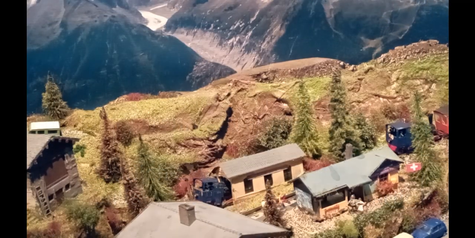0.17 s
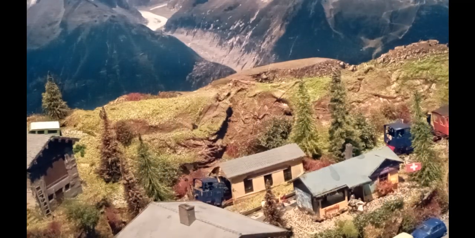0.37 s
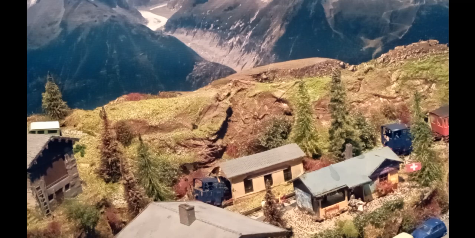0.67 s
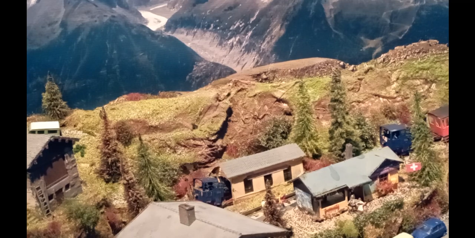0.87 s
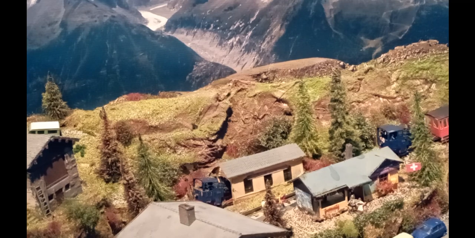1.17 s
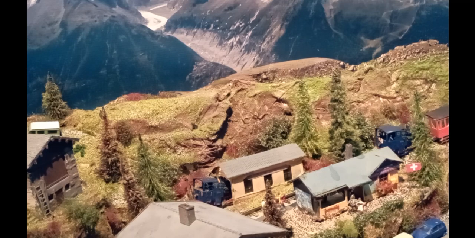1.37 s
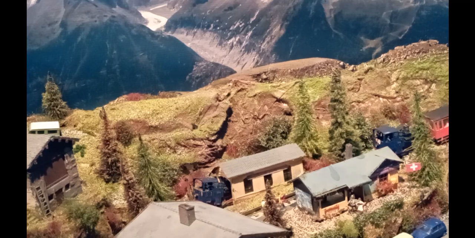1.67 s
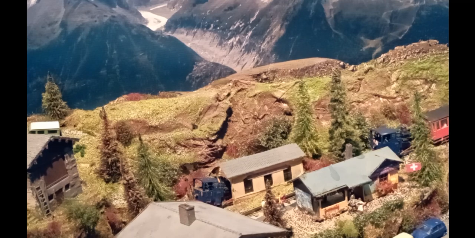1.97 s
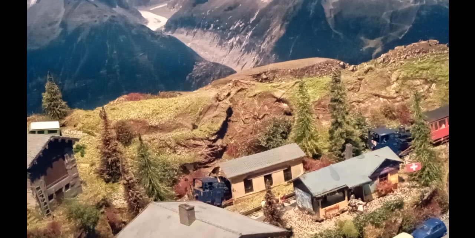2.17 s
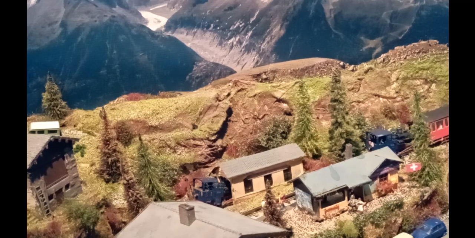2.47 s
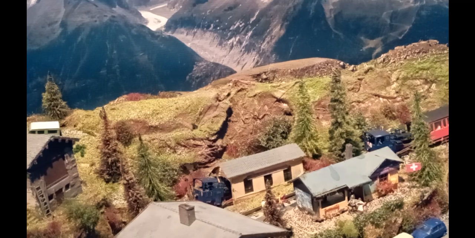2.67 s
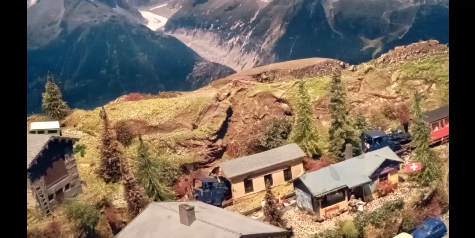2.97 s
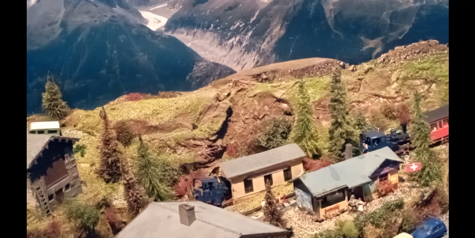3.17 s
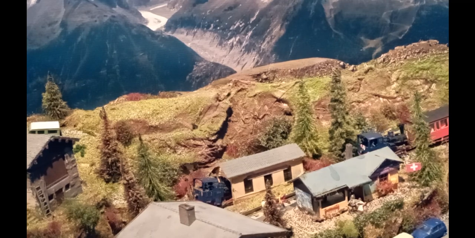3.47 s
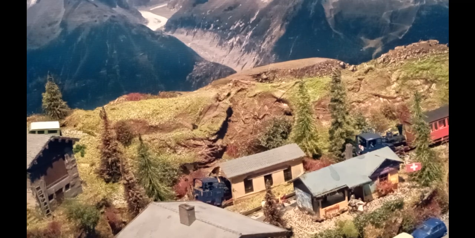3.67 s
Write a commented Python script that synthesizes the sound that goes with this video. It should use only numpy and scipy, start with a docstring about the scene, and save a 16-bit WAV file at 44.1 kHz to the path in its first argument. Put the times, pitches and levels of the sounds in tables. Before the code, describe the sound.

Model locomotive creeping along its track with a whirring drone, fizzing motor hiss and light ticking clatter

```python
"""A small electric model locomotive creeps over a miniature layout in a quiet room. Its wheels and gears
excite the resonances of the baseboard into a low rumble, and a drive hum sounds through the board.
Brush noise hisses, amplitude-modulated at the shaft, commutator, mains and gear rates. The gear train
ticks and wheels clack over rail joints as damped tones and noise bursts; flanges scrape briefly on the
bend, and low room tone lies beneath."""
import sys
import numpy as np
from scipy.fft import rfft, irfft, next_fast_len
from scipy.io import wavfile
from scipy.ndimage import map_coordinates

SR = 44100
rng = np.random.default_rng(int(sys.argv[2]) if len(sys.argv) > 2 else 0)


def store_pcm(level_fs):
    """Save levels as 16-bit WAV."""
    pcm = np.round(np.clip(level_fs, -1, 1) * 32767).astype(np.int16)
    wavfile.write(sys.argv[1], SR, np.atleast_2d(pcm).T)


N = 168903

SEGMENTS = 3  # commutator segments passed per turn of the shaft

# Low resonances of the baseboard: (centre [Hz], width [Hz], level [dB])
BOARD_BOOM = [(174.4, 24.4, -3.5), (194.7, 23, -2), (226.3, 40, -3.5), (251.1, 32.6, -5.5)]
# Higher resonances of the baseboard: (centre [Hz], width [Hz], level [dB])
BOARD_DRONE = [(333.5, 39, 0.5), (361.6, 40, -2), (406, 42, -5.5), (477.5, 27, -3.5), (514, 61, -6.5),
               (583.7, 31.5, -6), (647, 63, -11.5), (754, 45, -18.5)]


def amp(db):
    """Level law: decibels to amplitude ratio."""
    return 10 ** (np.asarray(db) / 20)


def unit(x):
    """Normalisation to an rms of 1."""
    return x / np.sqrt(np.mean(x ** 2) + 1e-20)


def along(points, hz):
    """Linear interpolation of (frequency [Hz], value) points on a logarithmic frequency axis."""
    f, v = np.transpose(points)
    return np.interp(np.log(hz + 1), np.log(f + 1), v)


def curves(rows):
    """Linear interpolation in time: one value per sample for each column after the time."""
    s, *cols = np.transpose(rows)
    return [np.interp(np.arange(N) / SR, s, c) for c in cols]


def wobble(rate):
    """Slow random modulation: a smooth curve through random knots, rate of them a second."""
    knots = rng.standard_normal(int(N * rate / SR) + 4)
    return map_coordinates(knots, [np.arange(N) * rate / SR])


def filtered(x, response):
    """Linear filtering: the spectrum of x times a complex response of frequency."""
    m = next_fast_len(N + SR // 2)
    return irfft(rfft(x, m) * response(np.fft.rfftfreq(m, 1 / SR)), m)[..., :N]


def body(modes):
    """Modal response: (Hz, width Hz, dB) resonances, steep on both flanks, summed in power."""
    def response(f):
        power = 0
        for c, w, db in modes:
            resonance = f * w / (c * c - f * f + 1j * f * w)
            power = power + amp(2 * db) * np.abs(resonance) ** 4
        return np.sqrt(power)
    return response


def shape(spectrum, modes=()):
    """Spectral envelope: (Hz, dB) points, lifted at any (Hz, width Hz, dB) resonances."""
    def response(hz):
        lift = sum((amp(db) - 1) / (1 + (2 * (hz - c) / w) ** 2) for c, w, db in modes)
        return amp(along(spectrum, hz)) * (1 + lift)
    return response


def grit(per_s, spread_db, share):
    """Random impulse excitation: two unrelated streams of noise, a share of the power in small blows."""
    struck = rng.random((2, N)) < per_s / SR
    strength = amp(spread_db * np.clip(rng.standard_normal((2, N)), -2, 2))
    sign = np.sign(rng.standard_normal((2, N)))
    blows = unit(struck * strength * sign)
    share = np.clip(share, 0, 1)
    return np.sqrt(share) * blows + np.sqrt(1 - share) * rng.standard_normal((2, N))


def wavering(turns, depth_db, depth_rad, rate):
    """Random amplitude and phase modulation of a tone, drawn separately for each stream."""
    streams = []
    for _ in range(2):
        level = amp(depth_db * wobble(rate))
        streams.append(level * np.sin(2 * np.pi * turns + depth_rad * wobble(rate)))
    return np.array(streams)


def ring(hz, t60, t):
    """Damped oscillation: a sine with a short rise and exponential decay."""
    envelope = amp(-60 * t / t60) * (1 - np.exp(-t / 0.00047))
    return envelope * np.sin(2 * np.pi * hz * t + rng.uniform(0, 2 * np.pi))


def bursts(events, t60, rise_s, spectrum):
    """Transient noise: coloured noise under exponentially decaying envelopes at (s, dB)."""
    level, t = np.zeros(N + SR), np.arange(SR // 8) / SR
    for s, db in events:
        level[round(s * SR):][:len(t)] += amp(db - 60 * t / t60) * (1 - np.exp(-t / rise_s))
    return level[:N] * unit(filtered(rng.standard_normal((2, N)), shape(spectrum)))


def shaft_turns():
    """Rotation as integrated rate: turns of the motor shaft so far."""
    # Motor speed: (time [s], commutator rate [Hz])
    commutator = [(0, 341), (.4, 336), (.85, 338), (1.2, 345), (1.45, 349), (1.7, 337), (2.0, 343),
                  (2.2, 330), (2.5, 342), (3.1, 349), (3.45, 338), (3.83, 341)]
    rate, = curves(commutator)
    return np.cumsum(rate) / SR / SEGMENTS


def rolling():
    """Forced vibration: wheel and gear bumps ring the baseboard and rattle the track; the drive hums."""
    # Rolling noise before flutter: (time [s], boom level [dB], drone level [dB], rattle level [dB])
    roll_levels = [(0.0, -29, -40.5, -47), (0.13, -33.5, -44, -51), (0.15, -36.5, -43, -51.5),
                   (0.32, -33, -47, -47), (0.45, -34, -40, -48), (0.74, -35.5, -48, -49.5),
                   (0.85, -34, -39, -51), (0.91, -43.5, -54, -52), (0.96, -33.5, -43.5, -51),
                   (1.0, -40.5, -49.5, -52.5), (1.24, -33.5, -39.5, -49), (1.25, -33.5, -40, -48.5),
                   (1.49, -41.5, -45.5, -49.5), (1.52, -42, -49, -52), (1.63, -33, -37, -45),
                   (1.83, -40.5, -42, -50.5), (1.89, -34, -47, -47.5), (1.97, -39.5, -44.5, -50),
                   (2.12, -34, -46.5, -48), (2.19, -31.5, -38, -45), (2.24, -36.5, -45, -44.5),
                   (2.27, -33.5, -34.5, -47), (2.32, -39, -43, -49.5), (2.41, -35.5, -39.5, -50.5),
                   (2.47, -39, -41, -50), (2.92, -41, -45.5, -52), (2.94, -36, -40, -49.5),
                   (3.07, -48.5, -44, -52.5), (3.11, -36, -45.5, -50), (3.23, -46.5, -45.5, -51.5),
                   (3.78, -42.5, -47.5, -52.5), (3.83, -38, -57, -50)]
    # Relative spectrum of the track rattle: (frequency [Hz], level per Hz [dB])
    rattle_spectrum = [(380, 1), (650, -8), (830, -0.5), (1000, -4), (1200, -13), (1600, -4), (2100, -0.5),
                       (2500, -5), (3000, -4), (3900, -6.5), (6600, -120)]
    # Chassis resonances lifting the rattle: (centre [Hz], width [Hz], lift [dB])
    chassis = [(1090, 57, 12), (1240, 33, 0), (1465, 140, 8)]
    # Hum of the drive in the board: (time [s], pitch [Hz], level [dB])
    drive_hum = [(0.0, 232.9, -44), (0.11, 219.7, -33), (0.44, 219, -36.5), (0.48, 245.8, -44),
                 (0.53, 227.2, -38), (1.07, 226.4, -39), (1.19, 246.7, -34.5), (1.44, 219.8, -46.5),
                 (1.6, 238.1, -38.5), (1.68, 226.3, -42.5), (2.27, 220.2, -35), (2.34, 243.7, -51),
                 (2.38, 230.7, -37.5), (3.21, 224.3, -49), (3.25, 215.4, -45.5), (3.65, 230.4, -44),
                 (3.78, 206.2, -45.5), (3.83, 221.0, -55)]
    boom_db, drone_db, rattle_db = curves(roll_levels)
    bumps = grit(per_s=200, spread_db=3, share=.3)
    rattling = grit(per_s=200, spread_db=3.3, share=0.2)
    surge = wobble(24.59)  # flutter common to the three bands, scaled in dB
    boom = amp(boom_db + 0.22 * surge) * unit(filtered(bumps, body(BOARD_BOOM)))
    drone = amp(drone_db + 0.76 * surge) * unit(filtered(bumps, body(BOARD_DRONE)))
    rattle = amp(rattle_db + 1.2 * surge) * unit(filtered(rattling, shape(rattle_spectrum, chassis)))
    hum_hz, hum_db = curves(drive_hum)
    hum = amp(hum_db) * unit(wavering(np.cumsum(hum_hz) / SR, depth_db=4.3, depth_rad=0.62, rate=26))
    return boom + hum + drone + rattle


def motor():
    """Amplitude modulation: brush noise pulses with shaft, commutator, mains and gear, beside a shaft tone."""
    # Brush noise before lift and flutter: (time [s], hiss level [dB], sizzle level [dB])
    brush_levels = [(0.0, -43.5, -52), (0.43, -43, -54), (0.93, -44, -52.5), (1.52, -43.5, -51),
                    (1.9, -44.5, -51), (2.23, -43.5, -51), (2.94, -44.5, -49), (3.31, -44.5, -50),
                    (3.83, -44, -49)]
    # Tone at shaft speed, before its waver: (time [s], level [dB])
    tone_levels = [(0.0, -68.5), (0.62, -38), (0.66, -53.5), (2.21, -46), (2.26, -37.5), (2.43, -51),
                   (3.82, -50), (3.83, -58)]
    # Relative spectrum of the hiss: (frequency [Hz], level per Hz [dB])
    hiss_spectrum = [(1410, -4.5), (2400, -12), (2740, -12.5), (3440, -8), (3790, -7), (4620, -3),
                     (6100, -3), (6810, -3), (8550, -2), (9950, -1.5), (11500, -9.5), (12500, -6),
                     (16200, -44), (22000, -120)]
    # Relative spectrum of the sizzle before its tilt: (frequency [Hz], level per Hz [dB])
    sizzle_spectrum = [(9000, -55), (12000, -29), (12900, -14), (13700, 4), (14250, 4), (14750, 9.5),
                       (15200, 1), (15700, 4), (15900, -0.5)]
    # Motor housing resonances: (centre [Hz], width [Hz], lift facing [dB], lift turned away [dB])
    housing = [(3400, 120, 3, 6.5), (5660, 300, 3, 3), (6860, 400, 8.5, 2.5), (7650, 200, 3.5, 2),
               (8520, 590, 3.5, 5.5), (9860, 2300, 4, -0.5)]
    # Hiss modulation depths [0-1]: (shaft, twice shaft, commutator, mains, gear)
    hiss_pulse = [0.075, 0.078, 0.065, 0.032, 0.019]
    # Sizzle modulation depths [0-1]: (shaft, twice shaft, commutator, mains, gear)
    sizzle_pulse = [.15, .05, .25, 0.17, .03]
    # The engine swings round the bend: (start [s], end [s])
    swing = (.8, 3.4)
    mains_hz, gear_ratio = 50, 4
    tilt_db = 3.5  # change of sizzle slope per kHz, from facing to turned away

    turns = shaft_turns()
    hiss_db, sizzle_db = curves(brush_levels)
    tone_db, = curves(tone_levels)
    mains_cycles = mains_hz * np.arange(N) / SR
    cycles = np.array([turns, 2 * turns, SEGMENTS * turns, mains_cycles, turns / gear_ratio])
    beats = np.cos(2 * np.pi * cycles)
    surge = wobble(45)
    away = np.interp(np.arange(N) / SR, swing, (0, 1))

    brushes = grit(per_s=600, spread_db=3.4, share=0.17)
    facing_modes = [(c, w, facing_db) for c, w, facing_db, _ in housing]
    turned_modes = [(c, w, turned_db) for c, w, _, turned_db in housing]
    facing = unit(filtered(brushes, shape(hiss_spectrum, facing_modes)))
    turned = unit(filtered(brushes, shape(hiss_spectrum, turned_modes)))
    hiss = unit((1 + hiss_pulse @ beats) * ((1 - away) * facing + away * turned))

    def tilted(x, slope_db):
        """Spectral tilt in dB per kHz about 14.5 kHz, level beyond 2 kHz either side."""
        return unit(filtered(x, lambda hz: amp(slope_db * np.clip(hz / 1000 - 14.5, -2, 2))))

    fizz = filtered(grit(per_s=600, spread_db=6.8, share=.06), shape(sizzle_spectrum))
    dull, bright = tilted(fizz, -tilt_db / 2), tilted(fizz, tilt_db / 2)
    sizzle = unit((1 + sizzle_pulse @ beats) * ((1 - away) * dull + away * bright))

    tone = amp(tone_db) * wavering(turns, depth_db=3.95, depth_rad=1.0, rate=9.5)
    hiss_gain = amp(hiss_db + .55 * surge + 2.5)  # flutter, then a fixed lift
    sizzle_gain = amp(sizzle_db + 0.37 * surge + 4.6)
    return hiss_gain * hiss + sizzle_gain * sizzle + tone


def room():
    """Stationary background: low filtered noise and a hum randomly modulated in level and phase."""
    # Relative spectrum of the room tone: (frequency [Hz], level per Hz [dB])
    room_spectrum = [(13, -66), (27, -46), (35, -24), (45, -11), (70, -0.5), (90, -1), (114, 3.5),
                     (140, -2), (170, -3.5), (220, -24), (370, -120)]
    air = unit(filtered(rng.standard_normal((2, N)), shape(room_spectrum)))
    hum_hz = 61.94
    hum = unit(wavering(hum_hz * np.arange(N) / SR, depth_db=2, depth_rad=0.74, rate=7.5))
    return amp(-45.5) * air + amp(-50.5) * hum


def ticks():
    """Impact transients: bright metal ticks of gear teeth and couplings, as decaying noise."""
    # Ticks, crest factor included: (time [s], peak level [dB])
    tick_events = [(0.017, -37), (0.0952, -33), (0.2014, -30), (0.2743, -34), (0.3117, -31), (0.36, -29),
                   (0.4198, -28), (0.497, -28.5), (0.6015, -32), (0.7008, -36), (0.734, -30), (0.842, -33),
                   (1.0209, -46), (1.054, -33), (1.1584, -32.5), (1.2341, -34), (1.2625, -32),
                   (1.4112, -31), (1.5221, -36), (1.5743, -32), (1.6372, -32), (1.6806, -36), (1.8611, -34),
                   (1.8936, -35), (1.9994, -35), (2.0745, -38), (2.153, -26.5), (2.2124, -34),
                   (2.2537, -31), (2.4957, -36), (2.537, -29.5), (2.6426, -36), (2.8192, -37), (2.853, -30),
                   (2.9546, -32), (3.475, -33), (3.758, -34), (3.7943, -31.5)]
    # Relative spectrum of a tick: (frequency [Hz], level per Hz [dB])
    tick_spectrum = [(3500, -47), (5000, -25), (6500, -23), (7600, 7), (8600, -2), (9900, 6), (11000, -3.5),
                     (13000, -25)]
    crest_db = 4.5  # peak over noise level
    return bursts([(s, db - crest_db) for s, db in tick_events], 0.034, 0.00022, tick_spectrum)


def clacks():
    """Impact excitation at rail joints: ring, hollow knock, crack, board thud and loose parts shaking on."""
    # Rail joints, levels before the trims below:
    # (time [s], level [dB], ring [Hz], crack over ring [dB], hollow knock over ring [dB])
    joints = [(0.0233, -34, 1390, 1.5, -7), (0.1116, -38, 1520, 0, -7), (0.1292, -29, 1450, -9, -16),
              (0.2026, -35.5, 1490, -5, -10), (0.2772, -41, 1420, -4, 0), (0.314, -39, 1460, -7, -6),
              (0.3603, -28, 1296, 1.5, -4), (0.4243, -31, 1290, -0.5, -2), (0.4682, -34, 1470, 0, -14),
              (0.498, -39, 1410, -4, -11), (0.5841, -42, 1440, -6, -9), (0.637, -38, 1425, 0, -7),
              (0.796, -46, 1650, -4, -11), (0.8138, -39, 1470, 3, -16), (0.847, -40, 1540, -3, -6),
              (0.9202, -34.5, 1430, -1, -9), (1.0262, -33.5, 1470, -12, -7), (1.1358, -42, 1090, 1, -8),
              (1.1648, -43.5, 1450, 3, -11), (1.4388, -38, 1610, 1, -14), (1.4681, -40, 2100, 0, -13),
              (1.504, -44, 1440, -4, -12), (1.5753, -38, 1410, -5, 1), (1.6387, -35.5, 1550, 4, -8),
              (1.6663, -41, 1608, 6, -5), (1.6909, -36, 1490, -2, -5), (1.715, -40, 1025, 0, 2),
              (1.7523, -35.5, 1020, -1, 3), (1.8214, -29, 1450, -5, -5), (1.955, -41, 1270, -8, -7),
              (1.9664, -39, 1426, -1, -13), (2.002, -38.5, 1440, 6, -11), (2.0767, -41, 942, 0, -4),
              (2.1114, -40, 1480, -8, -5), (2.154, -26.5, 1232, 0.5, -17), (2.2066, -37, 1080, -2, -7),
              (2.2558, -31.5, 1480, 4, -7), (2.3351, -40, 1036, 1, -4), (2.3955, -39, 2030, 0, 0),
              (2.4374, -39, 1090, 0, 0), (2.4772, -44, 1205, -2, -6), (2.4975, -41, 1120, -4, -8),
              (2.5393, -36, 1400, -1, -17), (2.5703, -38.5, 1400, -5, -11), (2.608, -38.5, 1433, -5, -8),
              (2.7185, -44.5, 1470, 3, 7), (2.9367, -37.5, 1078, -4, -6), (3.031, -35, 1495, -2, -12),
              (3.5504, -42, 1230, 0, 2), (3.7963, -42, 1200, 2, -11)]
    # Wagon body resonances: (frequency [Hz], level [dB], decay by 60 dB [s])
    wagon = [(637, -2.5, 0.032), (740, -4, 0.039), (894, -6.5, 0.033)]
    # Relative spectrum of the crack: (frequency [Hz], level per Hz [dB])
    crack_spectrum = [(300, -40), (500, 13), (800, -5), (2300, -3.5), (3000, -12), (6000, -10.5),
                      (8000, -18), (11000, -11), (13000, -40)]
    # Relative spectrum of loose parts after a clack: (frequency [Hz], level per Hz [dB])
    shake_spectrum = [(500, -30), (800, -8), (1100, 1), (1500, 7), (2300, -4.5), (2900, -17)]
    clack_db, thud_db, shake_db = -2.5, -10.5, -13  # trims: whole clack, thud within it, shaking parts
    out, t = np.zeros((2, N + SR)), np.arange(SR // 8) / SR
    for s, db, hz, _, knock_db in joints:
        for side in out:  # each stream draws its own phases
            tone = ring(hz, 0.036, t)
            tone += .55 * ring(1.19 * hz, 0.031, t) + 0.41 * ring(0.824 * hz, 0.028, t)
            knock = sum(amp(knock_db + level) * ring(c, t60, t) for c, level, t60 in wagon)
            thud = sum(amp(thud_db + level) * ring(c, 0.088, t) for c, _, level in BOARD_BOOM + BOARD_DRONE)
            side[round(s * SR):][:len(t)] += amp(db + clack_db) * (tone + knock + thud)
    crack_events = [(s, db + clack_db + crack_db) for s, db, _, crack_db, _ in joints]
    crack = bursts(crack_events, 0.034, 0.00051, crack_spectrum)
    shake = bursts([(s, db + shake_db) for s, db, *_ in joints], 0.13, 0.0032, shake_spectrum)
    return out[:, :N] + crack + shake


def scrapes():
    """Friction noise: wheel flanges brush the rail on the bend in brief chirps of band-shaped noise."""
    # Flange contacts: (time [s], level [dB])
    contacts = [(0.2024, -44.5), (0.2468, -57), (0.3127, -47), (0.3601, -53), (0.4214, -46), (0.8425, -47),
                (1.2301, -54), (1.6377, -41.5), (1.8612, -50), (1.9654, -43.5), (2.1101, -46),
                (2.2373, -40), (2.6444, -50), (3.3368, -45), (3.479, -46.5), (3.7813, -42.5)]
    # Relative spectrum of a scrape: (frequency [Hz], level per Hz [dB])
    scrape_spectrum = [(2000, -32), (2900, -18), (3430, 2), (4000, -13), (5500, -37)]
    return bursts(contacts, 0.091, 0.0009, scrape_spectrum)


def scene():
    """Interaural-style coherence: two streams mix to left and right with set likeness, balance and lag."""
    # Left-right coherence: (frequency [Hz], likeness [0-1])
    likeness = [(30, 0.78), (50, 0.96), (70, 0.54), (130, 0.53), (200, 0.92), (400, 0.68), (800, 0.41),
                (1650, 0.52), (3000, 0.25), (5000, 0.4), (8000, 0.23), (11000, 0.19), (15000, 0.16)]
    # Left-right balance: (frequency [Hz], left over right [dB])
    balance = [(30, -5), (70, -0.5), (180, -2), (550, 0), (2000, -0.1), (5000, -1.5), (9000, -3.5),
               (15000, 1)]
    lag_s = .00009  # left hears later than right

    def mid_side(hz):
        """Rotation whose double angle has the wanted likeness as its cosine."""
        angle = np.arccos(np.clip(along(likeness, hz), -1, 1)) / 2
        return np.array([np.cos(angle), np.sin(angle)])

    def lean(hz):
        """Half the balance and lag on the left, the inverse on the right."""
        half = amp(along(balance, hz) / 2) * np.exp(-1j * np.pi * hz * lag_s)
        return np.array([half, 1 / half])

    sources = rolling() + motor() + room() + ticks() + clacks() + scrapes()
    mid, side = filtered(sources, mid_side)
    return filtered(np.array([mid + side, mid - side]), lean)


def record(dry):
    """Band limitation: a steep low-pass removes the top of the spectrum."""
    top_hz, edge_hz = 15735, 25
    return filtered(dry, lambda hz: 1 / (1 + np.exp(np.clip((hz - top_hz) / edge_hz, -50, 50))))


dry = scene()
out = record(dry)
store_pcm(out)
```